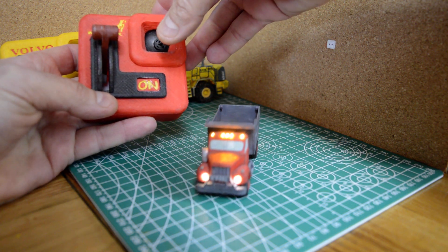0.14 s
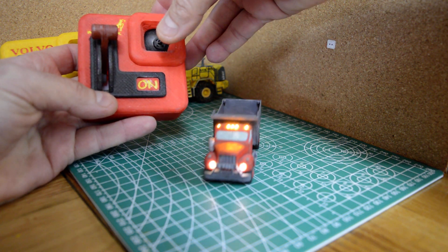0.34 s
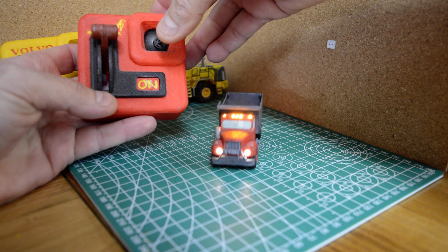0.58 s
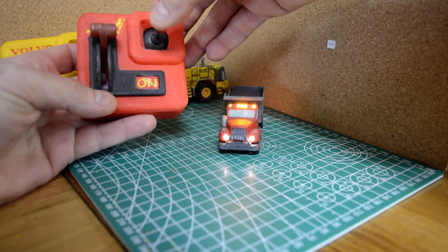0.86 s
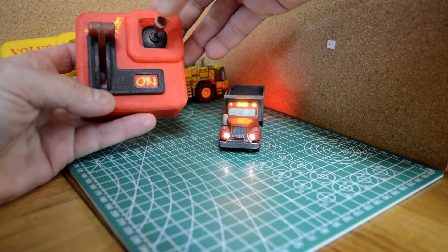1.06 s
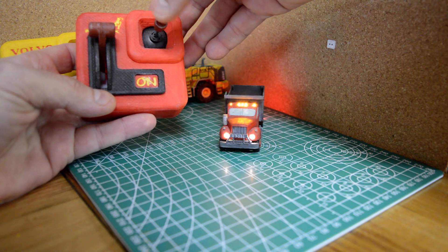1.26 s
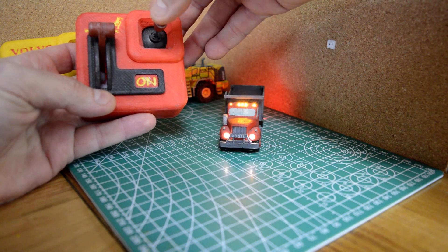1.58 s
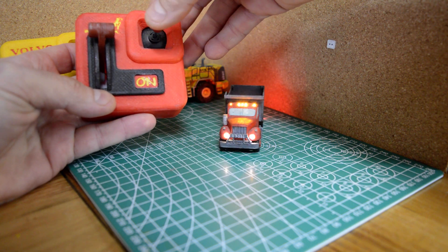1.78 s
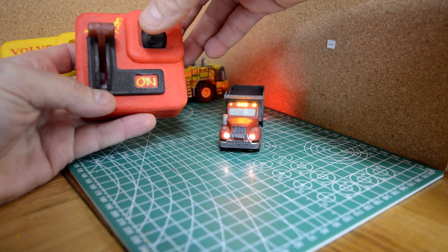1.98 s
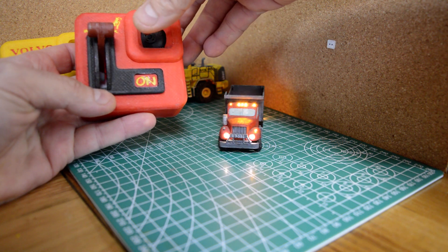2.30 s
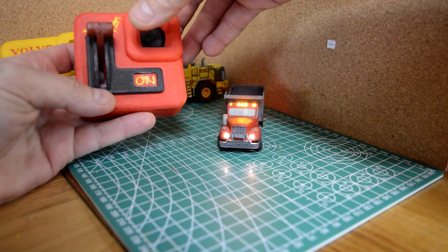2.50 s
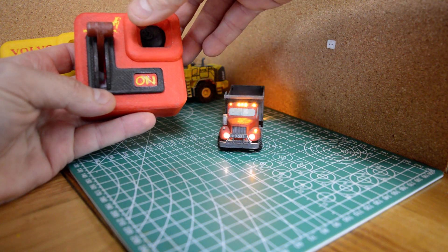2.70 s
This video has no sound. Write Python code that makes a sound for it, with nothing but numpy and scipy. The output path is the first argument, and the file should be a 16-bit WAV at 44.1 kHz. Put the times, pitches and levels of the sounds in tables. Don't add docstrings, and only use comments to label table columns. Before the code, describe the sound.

A tiny toy truck's motor and plastic gears whirr thinly from the start, rattling and snagging with sharp clicks, especially around 0.5 and 0.85 seconds, while tyres drone faintly on a mat. It slows after 1 second with a soft bump and stops by 1.4. Near 2.1, 2.2 and 2.4 seconds, short, bright, pulsing servo buzzes sound. Low appliance hum, uneven distant rumble and soft hiss continue in the quiet room.

```python
import sys
import numpy as np
from scipy import signal
from scipy.fft import rfft, irfft, next_fast_len
from scipy.io import wavfile
from scipy.ndimage import map_coordinates

SR = 44100
rng = np.random.default_rng(int(sys.argv[2]) if len(sys.argv) > 2 else 0)


def materialize(psi):
    bounded = np.clip(np.atleast_2d(psi).T, -1, 1)
    quanta = np.round(bounded * 32767).astype(np.int16)
    wavfile.write(sys.argv[1], SR, quanta)


def voltage_ratio(decibels):
    exponent = np.asarray(decibels, float) / 20
    return 10 ** exponent


N = 125685

# t/s, level/dB, knock rate [1/s], far-side share [0-1]
GEAR_DRIVE = [(0, -47.5, 162, 0.24), (.15, -47, 154, 0.24), (.27, -46, 170, 0), (.36, -44, 234, 0.06),
              (.45, -44.5, 220, 0.03), (.54, -46.5, 220, 0.5), (.65, -47.5, 183, 0.17),
              (.8, -48.5, 152, 0.62), (.83, -50.5, 195, .9), (.93, -49.5, 170, 0.7), (.97, -57.5, 160, 0.7),
              (1.02, -58, 175, 1), (1.07, -50.5, 140, 0.9), (1.17, -51.5, 110, 0.9),
              (1.21, -51.5, 120, 0.84), (1.33, -56, 80, 1), (1.42, -77, 100, 0.9)]
# f/Hz, width/Hz, level/dB
NEAR_SIDE = [(5320, 68, -13), (6110, 86, 1.5), (6700, 70, 0), (7250, 60, 3.5), (7860, 94, 2.5),
             (8170, 82, 0.5), (8900, 120, -2), (9900, 180, 0), (10400, 160, -3.5), (11500, 570, -3.5)]
# f/Hz, width/Hz, level/dB
FAR_SIDE = [(4080, 210, -4), (5330, 220, 1), (6270, 190, -2.5), (7500, 390, 0), (8620, 940, 2.5),
            (9700, 1140, 5), (11060, 170, -7), (11100, 900, -6)]
# f/Hz, level/dB
SHELL_COLOUR = [(1500, -29), (2600, -1), (4200, -6.5), (6000, -3.5), (9500, -7.5), (12000, -9),
                (15500, -23)]
# t/s, length/s, extra level/dB
GEAR_SNAGS = [(0.144, 0.0045, 11), (.445, 0.011, 5.5), (0.5, 0.014, 10.5), (0.579, .008, 6),
              (0.616, 0.065, 4), (.69, .05, 4.5), (0.675, 0.0091, 11.5), (0.702, 0.008, 9),
              (0.72, 0.0074, 9.5), (0.732, .014, 8.5), (.755, .014, 11), (0.767, 0.12, 7.5),
              (0.854, 0.024, 4.5), (0.942, 0.018, 9.5)]
# f/Hz, width/Hz, level/dB
SNAGGED_BODY = [(3300, 730, -1), (4960, 630, 0), (5980, 720, 1.5), (6900, 410, 5.5), (9070, 2400, 2)]
# t/s, f/Hz, level/dB, breadth [0-1]
PINION = [(0, 2930, -49.5, 0.7), (.05, 2990, -61.5, 0.5), (.08, 2950, -52, 0.3), (.14, 2960, -52, .3),
          (.17, 2960, -57, 0.4), (.23, 2900, -52, 0.3), (.28, 2880, -56, 0.25), (.36, 2910, -56.5, .3),
          (.44, 3000, -59, 0.5), (.49, 3120, -60, 0.8), (.55, 3150, -62, .6), (.62, 3220, -62, .6),
          (.78, 3290, -62, .9), (.86, 3300, -75, 0.8)]
# t/s, f/Hz, level/dB, breadth [0-1]
CROWN_MESH = [(.16, 6800, -75, .4), (.21, 6850, -56, .3), (.33, 6880, -52, .25), (.43, 7050, -51, .3),
              (.47, 7150, -58, .4), (.53, 7200, -75, .4)]
# t/s, f/Hz, level/dB, breadth [0-1]
CROWN_MESH_UPPER = [(.26, 7800, -75, .3), (.31, 7860, -55, .2), (.4, 7900, -66, .3), (.46, 8150, -62, 0.26),
                    (.54, 8200, -75, 0.48)]
# t/s, f/Hz, level/dB, breadth [0-1]
GEAR_CHATTER = [(0.301, 9300, -75, .5), (.35, 9350, -57, .4), (.41, 9450, -50, .4), (.44, 9550, -48, .4),
                (.47, 9600, -74, 0.73)]
# t/s, f/Hz, level/dB, breadth [0-1]
SLIPPING_BEARING = [(.62, 12600, -77.5, .9), (.7, 13300, -69, .95), (.78, 13800, -66.5, .9),
                    (.84, 14400, -68, .9), (.88, 14800, -86, .9)]
# t/s, peak level/dB, centre f/Hz
TOOTH_KNOCKS = [(0.0192, -32, 9600), (0.041, -35, 9500), (0.055, -31.5, 8100), (0.055, -32, 7900),
                (.069, -35.5, 7800), (.113, -37, 9000), (.191, -29, 7000), (0.2164, -28.5, 9400),
                (0.43, -29, 8700), (0.442, -28.5, 8440), (0.452, -33, 9700), (0.4796, -33, 7500),
                (.485, -25, 9200), (0.4895, -30.5, 8400), (0.496, -38, 7500), (.504, -38, 8550),
                (0.55, -34, 6500), (.574, -39, 7500), (0.8286, -28, 9400), (0.833, -33, 9000),
                (0.839, -30, 8600), (0.8455, -27, 10000), (.852, -27.5, 9300), (.86, -38, 9000),
                (0.8807, -33, 9000), (.907, -32.5, 8800), (.9395, -35, 7500), (0.963, -44, 7960),
                (.974, -41, 7500)]
# t/s, level/dB
TYRE_ROLL = [(0, -62), (.1, -54.5), (.19, -75), (.3, -55), (.42, -55), (.5, -69), (.65, -57.5), (.8, -50.5),
             (.92, -58.5), (1, -67), (1.1, -87)]
# start t/s, loudest t/s, end t/s, f/Hz, width/Hz, level/dB
MOTOR_COAST = (.98, 1.15, 1.33, 470, 70, -58)
# t/s, length/s, level/dB
SERVO_BUZZES = [
    (2.0946, 0.07, -36.5),
    (2.1745, 0.134, -35.5),
    (2.3735, 0.058, -35.5),
]
# f/Hz, width/Hz, level/dB
SERVO_CASE = [(2880, 290, -8.5), (3470, 120, -4.5), (4060, 260, -6), (5490, 350, -9), (6940, 360, -0.5),
              (7500, 360, -5.5), (8070, 350, -2), (8940, 370, -2.5), (9600, 420, -1), (10100, 250, 0.5),
              (10300, 270, 1.5), (10990, 390, 2.5), (11360, 380, 1), (14200, 4500, -18)]
# t/s, depth/dB
POWER_SAGS = [(2.112, 6), (2.133, 9), (2.153, 9), (2.192, 6), (2.2125, 11), (2.232, 5), (2.2515, 6),
              (2.2735, 9), (2.292, 8), (2.303, 4), (2.311, 5), (2.395, 3), (2.411, 10)]
# f/Hz, width/Hz, level/dB
APPLIANCE_HUM = [(197.5, 16, -64), (293.2, 1.24, -47.5), (332, 5.06, -64.5), (378, 9.54, -67.5),
                 (842, 4.84, -66.5), (957, 33, -62.5), (1166, 2.8, -70.5), (2444, 2.3, -72)]
# f/Hz, level/dB
WARMING_APPLIANCE = (251.5, -56)
# t/s, level/dB
DISTANT_RUMBLE = [(0.0, -58), (0.45, -52), (0.48, -64), (0.75, -51), (0.78, -69.5), (1.42, -49),
                  (1.73, -58.5), (1.76, -51), (1.89, -53), (1.93, -69), (2.01, -50), (2.49, -60),
                  (2.67, -50.5), (2.85, -56)]
# f/Hz, level density [dB per Hz]
ROOM_AIR = [(25, -14), (45, 0.5), (75, -5.5), (105, -5), (145, -11), (330, 0), (600, -9.5), (1000, -8.5),
            (2000, -15), (6000, -23.5)]
# f/Hz, width/Hz, level/dB
MIC_PEAK = (10200, 1100, -69.5)

RISE_S = .0008


def drive():
    effort_db, rate, far = curves(GEAR_DRIVE)
    far = np.clip(far, 0, 1)
    t = np.arange(N) / SR
    level = voltage_ratio(effort_db + wobble(29.95))

    knock_t60_s, knock_share, far_share = .011, .5, .3
    ring = t[:SR // 20]
    decay = voltage_ratio(-60 * ring / knock_t60_s) * (1 - np.exp(-ring / RISE_S))
    knocks = pulses(rate, jitter=.04, scatter_db=2)
    bursts = unit(signal.fftconvolve(knocks, decay)[:N])

    def force(share):
        return np.sqrt(share * bursts ** 2 + 1 - share) * rng.standard_normal(N)

    def side(peaks, widen):
        return lambda f: (body(peaks, widen)(f) + 0.22) * along(SHELL_COLOUR, f)

    def snag_response(f):
        return body(SNAGGED_BODY)(f) * steep(f, 1200) * (1 - steep(f, 11000))

    near_whirr = through(force(knock_share), level * np.sqrt(1 - far), side(NEAR_SIDE, 2))
    far_whirr = through(force(far_share), level * np.sqrt(far), side(FAR_SIDE, 1))
    snag = sum((voltage_ratio(db) - 1) * np.exp(-((t - s) / (.5 * length)) ** 4) for s, length, db in GEAR_SNAGS)
    snagging = through(force(far_share), level * snag * voltage_ratio(-1), snag_response)
    return near_whirr + far_whirr + snagging


def whine(rows):
    hz, level_db, breadth = curves(rows)
    breadth = np.clip(breadth, 0, 1)
    turn = np.exp(2j * np.pi * np.cumsum(hz) / SR)

    def shake(rate):
        return wobble(rate) + 1j * wobble(rate)

    clean = np.sqrt(1 - breadth) * (.5 + shake(130))
    smeared = np.sqrt(breadth) * shake(600)
    return voltage_ratio(level_db) * unit((turn * (clean + smeared)).real)


def ticks():
    width_hz, t60_s, top_hz = 5000, .008, 11500
    out = np.zeros(N)
    t = np.arange(SR // 50) / SR
    f = np.fft.rfftfreq(len(t), 1 / SR)
    softening = (1 + 1j * f / top_hz - (f / top_hz) ** 2) ** 3
    envelope = voltage_ratio(-60 * t / t60_s) * (1 - np.exp(-t / RISE_S))
    for s, db, hz in TOOTH_KNOCKS:
        rattle = envelope * rng.standard_normal(len(t))
        colour = body([(hz, width_hz, 0)])(f) ** 2 / softening
        click = irfft(rfft(rattle) * colour, len(t))
        out[round(s * SR):][:len(t)] += voltage_ratio(db) * click / np.abs(click).max()
    return out


def wheels():
    roll_hz, roll_width_hz = 109.5, 8
    bump_s, bump_db, bump_hz, bump_t60_s = 1.04, -41, 62, .14
    level_db, = curves(TYRE_ROLL)
    t = np.arange(N) / SR
    tone = np.sqrt(2) * np.sin(2 * np.pi * np.cumsum(roll_hz + 3 * wobble(4.3)) / SR)
    roll = voltage_ratio(level_db) * (1.02 * tone + 0.71 * narrow(roll_hz, roll_width_hz))

    since = np.clip(t - bump_s, 0, None)
    bump = voltage_ratio(bump_db - 60 * since / bump_t60_s) * np.sin(2 * np.pi * bump_hz * since)

    *times, coast_hz, coast_width_hz, coast_db = MOTOR_COAST
    coast = np.interp(t, times, [0, 1, 0]) * voltage_ratio(coast_db) * narrow(coast_hz, coast_width_hz)
    return roll + bump + coast


def servo():
    attack_s, release_s, sag_s = .007, .008, .0045
    teeth_per_s, tooth_t60_s = 800., .004
    t = np.arange(N) / SR
    gate = np.zeros(N)
    for s, length, db in SERVO_BUZZES:
        attack = np.clip((t - s) / attack_s, 0, 1) ** 2
        release = np.exp(-3 * np.clip(t - s - length, 0, None) / release_s)
        gate += voltage_ratio(db) * attack * release
    dip_db = -sum(db * np.exp(-((t - s) / sag_s) ** 2) for s, db in POWER_SAGS)
    level = gate * voltage_ratio(dip_db + 4.5 + 0.31 * wobble(35.0))

    teeth = pulses(np.full(N, teeth_per_s), jitter=.4, scatter_db=2)
    envelope = signal.fftconvolve(teeth, voltage_ratio(-60 * t[:SR // 100] / tooth_t60_s))[:N]
    rattle = envelope * rng.standard_normal(N)
    force = unit(rattle) + rng.standard_normal(N)
    return through(force, level, lambda f: (body(SERVO_CASE)(f) + 0.025) * steep(f, 2160))


def room(x):
    t60_s = .3
    t = np.arange(SR // 2) / SR
    tail = rng.standard_normal(len(t)) * voltage_ratio(-60 * t / t60_s)
    wet = signal.fftconvolve(x, tail / np.linalg.norm(tail))[:N]
    return filtered(wet, lambda f: .5 + body([(10200, 1800, 0)])(f))


def appliances():
    t = np.arange(N) / SR
    hum = np.zeros(N)
    for hz, width, db in APPLIANCE_HUM:
        sway = voltage_ratio(.8 * wobble(width))
        tone = np.sin(2 * np.pi * hz * t + .5 * wobble(width)) * sway
        hum += voltage_ratio(db) * (0.9 * tone + .25 * narrow(hz, 4 * width))
    hz, db = WARMING_APPLIANCE
    growing = voltage_ratio(db + 1.8 * t + 2.76 * wobble(6.4))
    return hum + growing * np.sin(2 * np.pi * hz * t + wobble(2.9))


def distant_machine():
    level_db, = curves(DISTANT_RUMBLE)
    turn = np.cumsum(47.2 + 2.5 * wobble(8)) / SR
    return voltage_ratio(level_db) * np.sqrt(2) * np.sin(2 * np.pi * turn)


def air_and_hiss():
    def air_response(f):
        return along(ROOM_AIR, f) * (f > 20) / (1 + (f / 7000) ** 2)

    air = voltage_ratio(-51 + 0.063 * wobble(5.3)) * unit(filtered(rng.standard_normal(N), air_response))
    hz, width_hz, db = MIC_PEAK
    return air + voltage_ratio(-60) * rng.standard_normal(N) + voltage_ratio(db) * narrow(hz, width_hz)


def unit(x):
    return x / np.sqrt(np.mean(x ** 2) + 1e-20)


def curves(rows):
    s, *cols = np.transpose(rows)
    return [np.interp(np.arange(N) / SR, s, c) for c in cols]


def wobble(rate):
    knots = rng.standard_normal(int(N * rate / SR) + 4)
    return map_coordinates(knots, [np.arange(N) * rate / SR])


def filtered(x, response):
    m = next_fast_len(N + SR // 2)
    return irfft(rfft(x, m) * response(np.fft.rfftfreq(m, 1 / SR)), m)[..., :N]


def along(points, hz):
    f, v = np.transpose(points)
    return voltage_ratio(np.interp(np.log(hz + 1), np.log(f + 1), v))


def body(peaks, widen=1):
    def response(f):
        total = 0
        for k, (centre, width, db) in enumerate(peaks):
            damping = 1j * f * width * widen
            total = total + (-1) ** k * voltage_ratio(db) * damping / (centre * centre - f * f + damping)
        return total
    return response


def steep(f, hz):
    return (f / hz) ** 4 / (1 + (f / hz) ** 4)


def through(force, level, response):
    shaped, reference = filtered(np.array([force * level, force]), response)
    return shaped / np.std(reference)


def pulses(rate, jitter, scatter_db):
    at = np.flatnonzero(np.diff(np.floor(np.cumsum(rate / SR))))
    draw = np.clip(rng.standard_normal((N // 8, 2))[:len(at)], -2, 2)
    shift = (jitter * draw[:, 0] * SR / rate[at]).astype(int)
    return np.bincount(np.clip(at + shift, 0, N - 1), voltage_ratio(scatter_db * draw[:, 1]), N)


def narrow(hz, width_hz):
    resonance = body([(hz, width_hz, 0)])
    return unit(filtered(rng.standard_normal(N), lambda f: resonance(f) ** 2))


def scene():
    tones = (PINION, CROWN_MESH, CROWN_MESH_UPPER, GEAR_CHATTER, SLIPPING_BEARING)
    truck = drive() + sum(map(whine, tones)) + ticks() + servo()
    background = appliances() + distant_machine() + air_and_hiss()
    return (truck + voltage_ratio(-17) * room(truck) + wheels() + background)[None]


def band_limit(x):
    return signal.sosfilt(signal.butter(12, 15840, fs=SR, output="sos"), x)


def record(dry):
    top_hz = 15830
    mix = filtered(dry, lambda f: f < top_hz)
    return band_limit(mix)


dry = scene()
out = record(dry)
materialize(out)
```